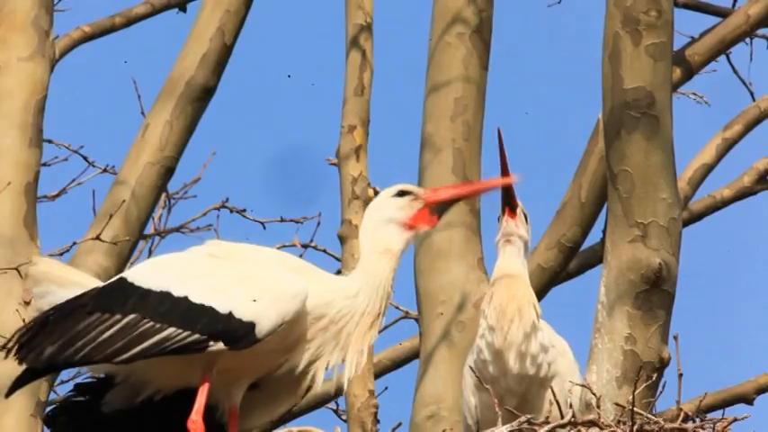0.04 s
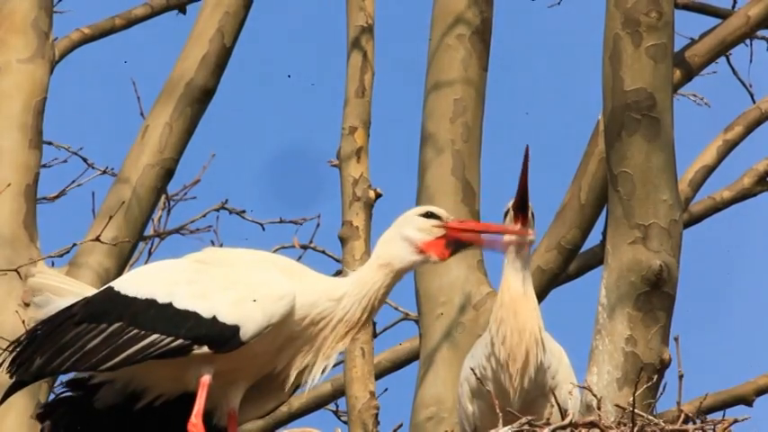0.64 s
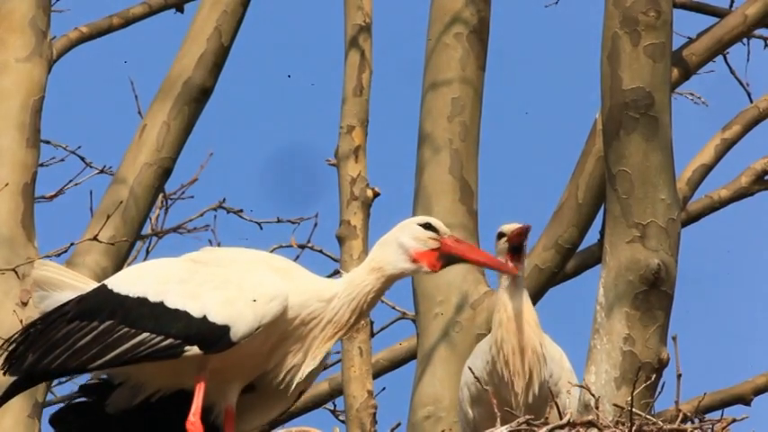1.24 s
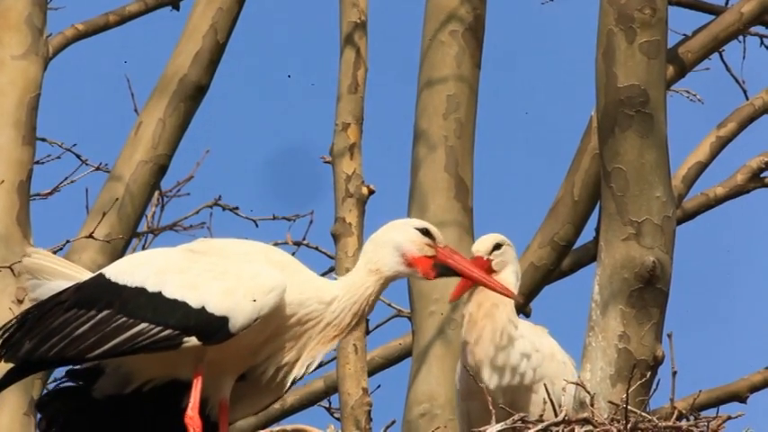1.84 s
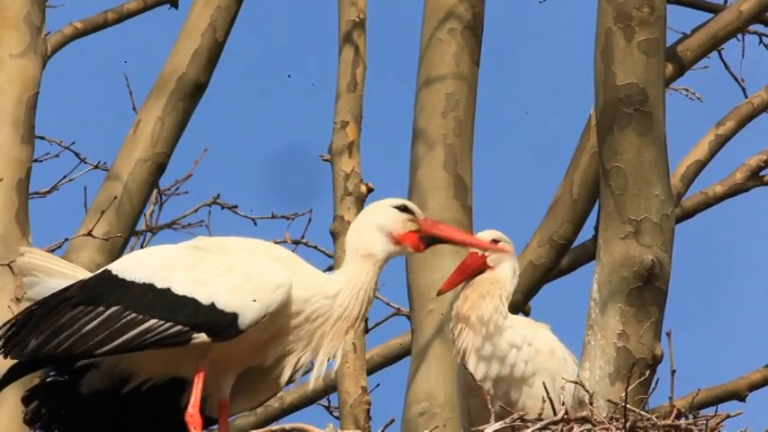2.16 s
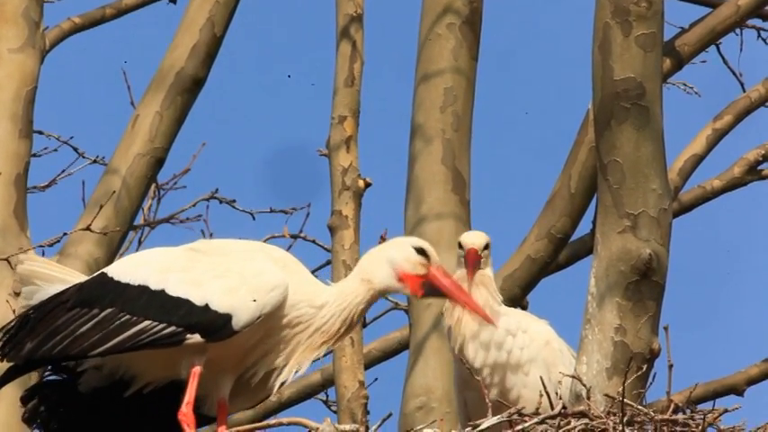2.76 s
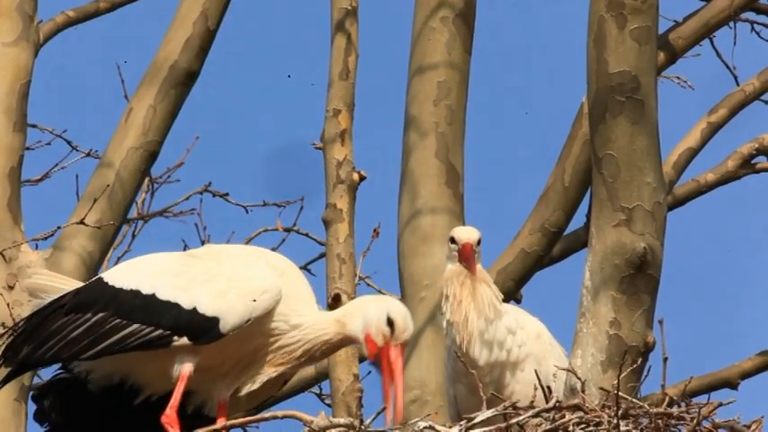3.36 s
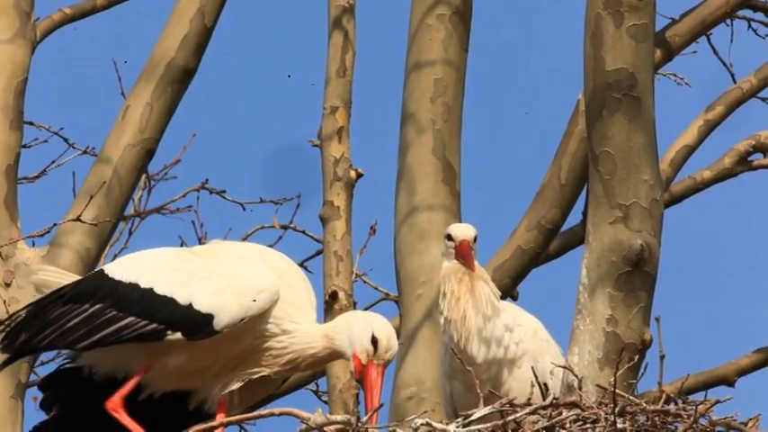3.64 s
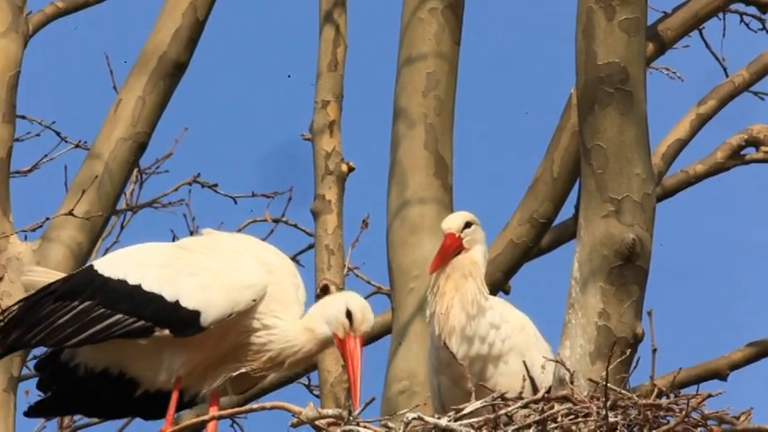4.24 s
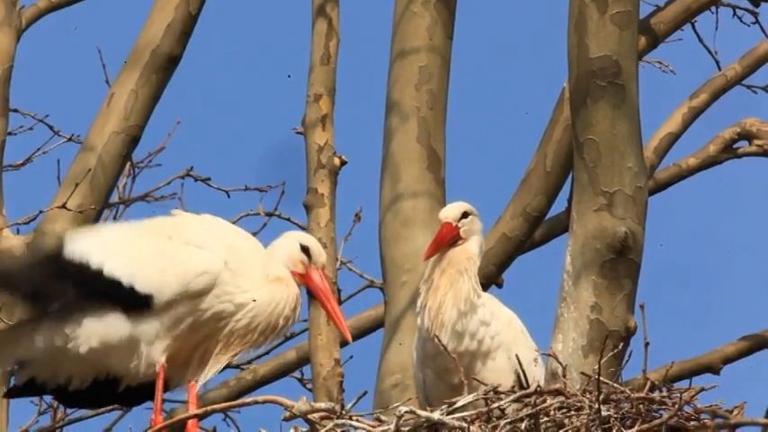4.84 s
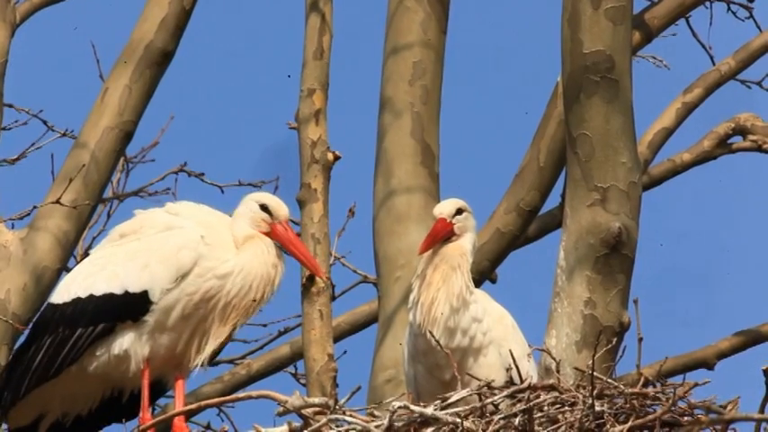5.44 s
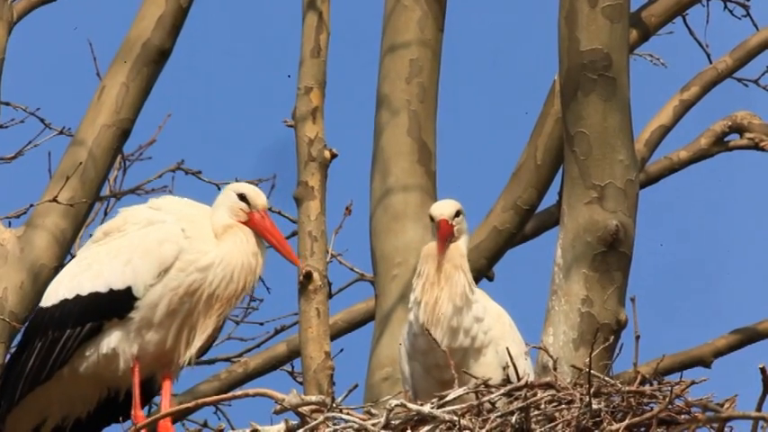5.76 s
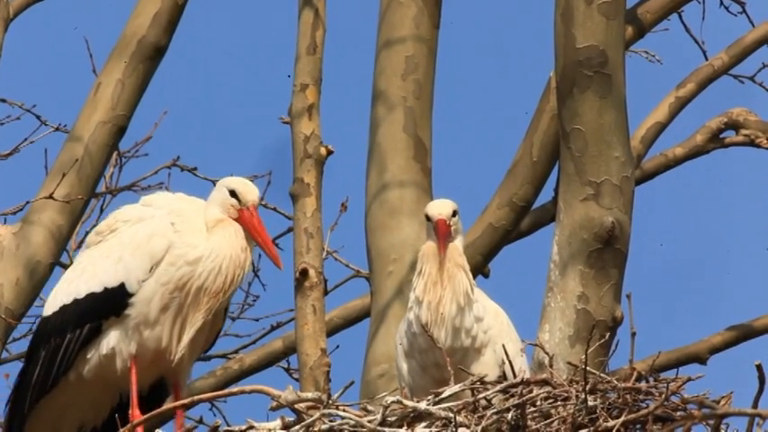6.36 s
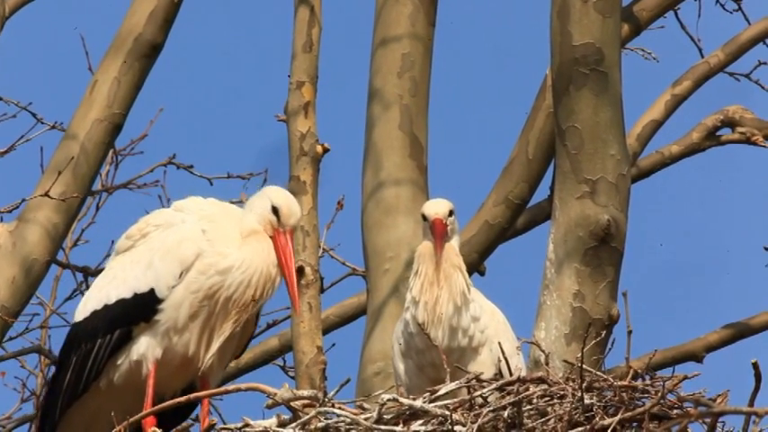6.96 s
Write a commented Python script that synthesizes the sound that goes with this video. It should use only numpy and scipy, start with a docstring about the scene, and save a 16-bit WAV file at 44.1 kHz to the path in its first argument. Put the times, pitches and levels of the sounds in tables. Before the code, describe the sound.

White storks clatter their bills in fast, hollow then dry clacking runs, over a steady outdoor rush and distant songbirds.

```python
"""A white stork colony, one microphone near the nests, in a steady rush of open air with songbirds further off.
A close stork clatters its bill in an even run of hollow clacks, neighbours joining in at first.
At about 3 s a second takes over with drier snaps, speeds up and turns away for a while; from 5 s the
neighbours are back. Each clack is the bill snapping shut and ringing with the throat pouch, and nearby
surfaces throw it back."""
import sys
import numpy as np
from scipy import signal
from scipy.fft import rfft, irfft, next_fast_len
from scipy.io import wavfile
from scipy.ndimage import map_coordinates

SR = 44100
rng = np.random.default_rng(int(sys.argv[2]) if len(sys.argv) > 2 else 0)


def int16_out(signal):
    """Quantize to a 16-bit WAV file."""
    q = np.round(np.clip(np.atleast_2d(signal).T, -1, 1) * 32767)
    wavfile.write(sys.argv[1], SR, q.astype(np.int16))


N = 317520
CONTACT_S = .005  # the bill's main contact comes this far into a clack

# pouch and bill resonances of a dry snap: centre_hz, width_hz, gain_db
DRY_BILL_MODES = [(712, 87, 15.6), (1597, 41, 17), (1877, 108, 17.6), (2540, 2200, 7.7), (3600, 2000, 12.6),
                  (5200, 1800, 17)]


def amp(db):
    return 10 ** (np.asarray(db) / 20)


def unit(x):
    return x / np.sqrt(np.mean(x ** 2) + 1e-20)


def along(points, hz):
    """Interpolate (frequency_hz, value) points on a log axis."""
    point_hz, values = np.transpose(points)
    return np.interp(np.log(hz + 1), np.log(point_hz + 1), values)


def wobble(rate):
    """A smooth random curve, rate knots a second."""
    return map_coordinates(rng.standard_normal(int(N * rate / SR) + 4), [np.arange(N) * rate / SR])


def filtered(x, response):
    """Shape x by a response that is a function of frequency."""
    size = next_fast_len(N + SR // 2)
    return irfft(rfft(x, size) * response(np.fft.rfftfreq(size, 1 / SR)), size)[:N]


def add(track, start_s, sound):
    i = int(np.clip(round(start_s * SR), 0, N))
    track[i:i + len(sound)] += sound[:N - i]


def noise(spectrum):
    """Coloured noise of rms 1."""
    return unit(filtered(rng.standard_normal(N), lambda hz: amp(along(spectrum, hz))))


def air():
    """The bed of the place: distant rumble with a low drone in it, a broad rush, and hiss, all wavering."""
    # swell of the surroundings: time_s, rush_gain_db, hiss_gain_db
    swell = [(.3, -41, -28), (.8, -40, -28), (2.88, -40.5, -30), (4.03, -45, -36), (5.01, -39.5, -29),
             (5.64, -39.5, -30.5), (6.64, -47.2, -37.5), (7.2, -42.5, -29)]
    # spectra of the three layers: frequency_hz, gain_db
    rumble_spectrum = [(20, -22), (30, -17), (42, 5.5), (65, 2), (100, 3.5), (160, 3), (290, -1),
                       (400, -27), (660, -120)]
    rush_spectrum = [(180, -36), (300, -1.5), (404, 4), (586, 3.5), (676, 5), (847, 4), (1010, -4.5),
                     (1120, 1), (1400, -5.5), (1820, -3), (3080, -120)]
    hiss_spectrum = [(820, -14), (1400, -6), (1500, 4), (1730, -0.5), (1900, 6.5), (2060, -1.5), (2660, 2),
                     (3100, -3.5), (3400, -0.5), (3720, -1), (5770, -4), (7300, -10), (16000, -42)]
    times, *gains = np.transpose(swell)
    rush_db, hiss_db = (np.interp(np.arange(N) / SR, times, gain) for gain in gains)
    drone = amp(-6.5) * noise([(54, -54), (66, -3), (71, -5), (76, -2), (92, -55)])
    rumble = amp(rush_db - 7 + .66 * wobble(10)) * (noise(rumble_spectrum) + drone)
    rush = amp(rush_db + .94 + .61 * wobble(8.6)) * noise(rush_spectrum)
    hiss = amp(hiss_db - 7 + 1.52 * wobble(25)) * noise(hiss_spectrum)
    return rumble + rush + hiss


def echoes(x, paths):
    """Reflections (delay_s, gain_db) off rough surfaces, which return less treble."""
    def response(hz):
        returns = sum(amp(db) * np.exp(-2j * np.pi * hz * delay_s) for delay_s, db in paths)
        return returns / (1 + (hz / 13000) ** 2)
    return filtered(x, response)


def scatter(delay_s, twigs_db, twigs_decay_s, size=12288):
    """A fresh impulse response of the place: a clump of reflections off branches, then a thin tail."""
    # reverberation among the nests: frequency_hz, t60_s
    decay_times = [(300, 0.095), (2000, 0.066), (6000, 0.38), (12000, 0.09)]
    hz, t, spectra = signal.stft(rng.standard_normal(size), SR, nperseg=256)
    decay = amp(-60 * t / along(decay_times, hz)[:, None])
    tail = signal.istft(spectra * decay, SR, nperseg=256)[1]
    t = np.arange(len(tail)) / SR
    twigs = rng.standard_normal(len(t)) ** 3 * np.exp(-t / twigs_decay_s)
    answer = tail / np.linalg.norm(tail) + amp(twigs_db) * twigs / np.linalg.norm(twigs)
    return np.pad(answer / np.linalg.norm(answer), (int(delay_s * SR), 0))


def whistle(length_s, start_hz, end_hz, db):
    """One slurred note: pitch and loudness arch together, and the pitch quavers."""
    progress = np.linspace(0, 1, int(length_s * SR))
    arch = np.abs(np.sin(np.pi * progress))
    quaver = map_coordinates(rng.standard_normal(10), [9 * progress])
    hz = (start_hz + (end_hz - start_hz) * progress) * (1 + .07 * (arch - .6) + .015 * quaver)
    return amp(db) * arch * np.sin(2 * np.pi * np.cumsum(hz) / SR)


def songbirds(far_notes=130, note_s=.041, spacing_s=.089, sag=.93):
    """Clear phrases and pips, amid far twittering that reaches the microphone only by way of the trees."""
    # opening slur of each phrase: start_s, start_hz, end_hz, gain_db
    phrases = [(1.046, 6420, 5500, -38), (1.9, 6790, 5180, -32.5), (2.258, 6810, 5150, -32),
               (2.925, 5530, 4910, -37.5), (3.64, 5500, 5270, -39), (4.23, 6040, 5000, -41),
               (4.549, 6740, 5040, -35.5), (4.999, 6150, 5500, -36.5), (5.424, 5620, 6230, -36),
               (6.253, 6900, 5170, -39), (6.624, 6700, 5300, -48), (6.999, 5320, 5750, -38)]
    # low single pips of another small bird: start_s, gain_db
    pips = [(4.05, -38.5), (4.66, -37), (7.03, -35)]
    near, far = np.zeros((2, N))
    for start_s, start_hz, end_hz, db in phrases:
        add(near, start_s, whistle(note_s, start_hz, end_hz, db))
        for step in (1, 2):  # two more notes step down and fade
            hz = (start_hz + end_hz) / 2 * .83 ** step
            add(near, start_s + step * spacing_s, whistle(note_s, hz, hz * sag, db - 4.5 * step))
    for start_s, db in pips:
        add(near, start_s, whistle(.03, 3320, 3320 * sag, db))
    for when, pitch, slur in rng.random((far_notes, 3)):
        hz = 3400 + 2700 * pitch
        add(far, when * N / SR, whistle(.028, hz, hz * (.72 + .45 * slur), db=-38.5))
    trees = scatter(delay_s=.011, twigs_db=-15, twigs_decay_s=.016)
    return amp(6) * near + signal.fftconvolve(amp(-2.5) * near + far, trees)[:N]


def sticks():
    """Dry nest sticks shift under the birds: short clumps of grains in one band each."""
    # knocks, snaps and rustles: start_s, length_s, centre_hz, level_db
    shifts = [(0.274, 0.01, 1140, -32.5), (0.627, 0.006, 1280, -29), (2.722, 0.12, 6550, -42),
              (6.481, 0.0026, 5500, -35), (6.697, 0.0034, 7300, -39), (6.806, 0.0027, 7700, -40)]
    track = np.zeros(N)
    for start_s, length_s, centre_hz, db in shifts:
        arch = np.sin(np.linspace(0, np.pi, int(length_s * SR)))
        band = signal.butter(2, [centre_hz * .8, centre_hz * 1.25], "band", fs=SR)
        grains = signal.lfilter(*band, rng.standard_normal(len(arch)) ** 3)
        add(track, start_s, amp(db) * unit(grains * arch))
    return track


def clack(modes, ring_db, crack_db, bill_hz, rattle, spread_s, top_hz, size=2048):
    """One closing of the bill: a main contact, the long edges also touching just before and after."""
    t = np.arange(size) / SR - CONTACT_S
    hz = np.fft.rfftfreq(size, 1 / SR)
    touches = rng.standard_normal(size) ** 3 * np.exp(-np.abs(t) / spread_s) * (t > -.0014)
    # the light touches make up the crack; the main contact does more of the ringing
    touch_share = np.clip(rattle, .28, 1) * np.interp(hz, [2800, 4200], [.3, .9])
    # bending waves run along the bill, the treble fastest
    bending = np.clip(rattle, 0, 1) * (.17 * np.sqrt(hz) - .0017 * hz)
    contact = np.exp(-2j * np.pi * (hz * CONTACT_S + bending))
    force = np.sqrt(touch_share) * rfft(touches) / np.linalg.norm(touches)
    force += np.sqrt(1 - touch_share) * contact
    body = 0
    for centre, width, db in modes:
        if 1000 < centre < 4000:  # the bill's resonances shift with posture; the pouch keeps its note
            centre = centre * bill_hz / 1820
        resonance = 1j * hz * width / (centre ** 2 - hz ** 2 + 1j * hz * width)
        body = body + amp(db + rng.normal(0, 1)) * resonance
    # a slender bill radiates little bass; distance takes off the top
    spectrum = force * body * hz ** 2 / (hz ** 2 + 330 ** 2) / np.sqrt(1 + (hz / top_hz) ** 10.3)
    lowpass = 1 / (1 + (hz / 3400) ** 12)
    ring, crack = irfft(spectrum * lowpass), irfft(spectrum * (1 - lowpass))
    # levels are rms over 5 ms
    return (amp(ring_db) * unit(ring) + amp(crack_db) * unit(crack)) * np.sqrt(.005 * SR / size)


def far_nests(count=120):
    """Faint, scattered clacks from across the colony."""
    track = np.zeros(N)
    for when, strength, pitch in rng.random((count, 3)):
        db = -41.5 + 4.8 * strength
        bill_hz = 1650 + 350 * pitch
        snap = clack(DRY_BILL_MODES, db, db + 2.5, bill_hz, rattle=.98, spread_s=.0096, top_hz=7200)
        add(track, when * N / SR, snap)
    return track


def tilted(modes, overtones_db):
    """The same resonances with the overtones raised or lowered."""
    return [(hz, width, db + overtones_db * (hz > 2200)) for hz, width, db in modes]


def run_of_clacks(tempo, closing):
    """The bill beats on at its tempo, no two strokes alike. Rows: time_s, ring_db, crack_db, rattle."""
    times = [tempo[0][0]]
    while times[-1] <= tempo[-1][0]:
        times.append(times[-1] + 1 / np.interp(times[-1], *np.transpose(tempo)))
    times = np.array(times[:-1])
    closing_s, *controls = np.transpose(closing)
    ring_db, crack_db, rattle = (np.interp(times, closing_s, control) for control in controls)
    softness, looseness = rng.standard_normal((2, len(times)))
    uneven_db = -.34 * softness
    return np.column_stack([times, ring_db + uneven_db, crack_db + uneven_db, rattle * (1 + .049 * looseness)])


def clatter(strokes, posture, modes, side_modes, near_paths, far_paths, spread_s, top_hz,
            ring_gain_db, crack_gain_db, side_fill, scatter_db, scatter_delay_s, twigs_db):
    """Clacks and their echoes. A bird that turns away loses more direct sound than reflected sound."""
    direct, sideways, scattered = np.zeros((3, N))
    posture_s, *colour = np.transpose(posture)
    full_ring_db, full_crack_db = np.max(strokes, axis=0)[1:3]
    for time_s, ring_db, crack_db, rattle in strokes:
        bill_hz, overtones_db = (np.interp(time_s, posture_s, column) for column in colour)
        timbre = bill_hz, rattle, spread_s, top_hz
        start_s = time_s - CONTACT_S
        front = clack(tilted(modes, overtones_db), ring_db + ring_gain_db, crack_db + crack_gain_db, *timbre)
        add(direct, start_s, front)
        # as the bird turns away, more ring than crack goes out to the side
        side_ring_db = ring_db + side_fill * (full_ring_db - ring_db)
        side_crack_db = crack_db + side_fill * (full_crack_db - crack_db) / 2 + .5
        side = clack(tilted(side_modes, overtones_db), side_ring_db, side_crack_db, *timbre)
        add(sideways, start_s, side)
        branches = scatter(scatter_delay_s, twigs_db, twigs_decay_s=.0064)
        add(scattered, start_s, signal.fftconvolve(side, branches))
    return direct + echoes(direct, near_paths) + echoes(sideways, far_paths) + amp(scatter_db) * scattered


def neighbours():
    """Storks on nearby nests: each run keeps its beat while it fades or swells."""
    # even runs: first_s, last_s, clack_count, first_ring_db, last_ring_db, crack_over_ring_db
    runs = [(0.108, 1.235, 9, -19, -26, -8.5), (0.1798, 0.5523, 4, -22, -25, -14),
            (0.2225, 0.8977, 7, -20, -27, -12.5), (5.168, 6.3642, 10, -28.5, -26, -10.5),
            (6.494, 6.8747, 4, -26.5, -26.5, -6), (7.017, 7.163, 2, -26.5, -27.5, -9)]
    # bill colour as the heads move: time_s, bill_hz, overtones_db
    posture = [(.1, 1940, 2.7), (1.2, 1800, 0), (5.2, 1780, -3.1), (7.2, 1800, 1)]
    # pouch and bill resonances: centre_hz, width_hz, gain_db
    modes = [(707, 127, 8.5), (1510, 47, -9), (1727, 170, 12.5), (2350, 85, 9.5), (4020, 330, -16),
             (6560, 580, -35)]
    rattle = .741
    strokes = []
    for first_s, last_s, count, first_db, last_db, crack_over_ring_db in runs:
        for time_s, db in np.linspace((first_s, first_db), (last_s, last_db), count):
            strokes.append((time_s, db, db + crack_over_ring_db, rattle))
    return clatter(strokes, posture, modes, side_modes=modes,
                   near_paths=[(.0058, -7.5)], far_paths=[(.021, -54)], spread_s=.0067, top_hz=7200,
                   ring_gain_db=1, crack_gain_db=6.4, side_fill=.062,
                   scatter_db=-7, scatter_delay_s=.008, twigs_db=-5)


def hollow_stork():
    """The first close bird: even, hollow clacks, each doubled by the shortest echo."""
    # beat of the bill: time_s, clacks_per_s
    tempo = [(.1265, 8.743), (1.22, 9.082), (1.43, 8.807), (2.38, 8.754), (3.19, 8.806)]
    # how the bill closes: time_s, ring_db, crack_db, rattle (0-1)
    closing = [(.13, -19.5, -27.5, 0.88), (1.68, -19, -25, 0.91), (1.85, -19, -28.5, 0.67),
               (2.14, -18.5, -29, 0.65), (2.28, -19, -24.5, 0.61), (2.65, -18.5, -28.5, 0.52),
               (2.95, -20.5, -32.5, 0.84), (3.18, -27.5, -43, 0.99)]
    # bill colour as the head moves: time_s, bill_hz, overtones_db
    posture = [(.1, 1816, 3), (1, 1777, 3.5), (1.7, 1830, 2), (2.1, 1910, -3), (2.5, 1890, -2.5),
               (3.1, 1814, -3.5)]
    # pouch and bill resonances: centre_hz, width_hz, gain_db
    modes = [(717, 270, -4), (1660, 52, -27), (1814, 167, 8.5), (2587, 300, 3), (3190, 57, -3),
             (4280, 790, -13), (6370, 1500, -11.5)]
    return clatter(run_of_clacks(tempo, closing), posture, modes, side_modes=modes,
                   near_paths=[(.00462, -2.1)], far_paths=[(.0124, -16), (.0381, -11)],
                   spread_s=.0034, top_hz=6450, ring_gain_db=.1, crack_gain_db=1.8, side_fill=.37,
                   scatter_db=-8.5, scatter_delay_s=.007, twigs_db=.5)


def dry_stork():
    """The second close bird: drier snaps, heard more by their echoes while it faces off the microphone."""
    # beat of the bill: time_s, clacks_per_s
    tempo = [(3.1263, 8.107), (3.24, 8.747), (3.69, 8.947), (3.91, 12.055), (4.11, 11.418), (4.98, 11.321),
             (6.07, 9.809), (6.37, 9.086), (7.19, 8.86)]
    # how the bill closes: time_s, ring_db, crack_db, rattle (0-1)
    closing = [(3.13, -23.5, -27, 0.14), (3.25, -21, -19.5, 0.038), (3.4, -19.5, -26.5, 0.34),
               (3.901, -22, -22.5, 0.82), (4.07, -25.5, -26.5, 0.35), (4.17, -46, -31.5, 0.28),
               (4.51, -38.5, -36, 0.28), (4.8, -28.5, -30.5, 0.52), (5.52, -32, -25, 0.33),
               (5.78, -25.5, -19.5, .03), (6.08, -25, -22, 0.17), (6.28, -23.5, -23.5, 0.62),
               (7.17, -21.5, -22, 0.85)]
    # bill colour as the head moves: time_s, bill_hz, overtones_db
    posture = [(3.1, 1870, 0.48), (3.7, 1783, -0.3), (6.2, 1724, -2.1), (6.4, 2130, 2.3), (7.2, 1840, 0)]
    # resonances as they sound to the side: centre_hz, width_hz, gain_db
    side_modes = [(700, 160, 15.5), (1545, 110, 19), (2656, 500, 17.5), (5900, 4800, 14.5)]
    return clatter(run_of_clacks(tempo, closing), posture, DRY_BILL_MODES, side_modes,
                   near_paths=[(.00462, -6)], far_paths=[(.0192, -15), (.044, -19.5)],
                   spread_s=.0035, top_hz=7650, ring_gain_db=-.64, crack_gain_db=-1.5, side_fill=1.21,
                   scatter_db=-15.5, scatter_delay_s=.008, twigs_db=8)


def scene():
    """The colony as it arrives at the microphone, in mono."""
    storks = hollow_stork() + dry_stork() + neighbours() + far_nests()
    return (storks + sticks() + songbirds() + air())[None]


def record(dry, silence_s=.085, fade_s=.0056, ceiling=.9, top_hz=15900):
    """The sound opens after a moment of silence; sharp peaks are rounded off and the top treble is cut."""
    opening = np.clip((np.arange(N) / SR - silence_s) / fade_s, 0, 1)
    rounded = dry[0] / (1 + np.abs(dry[0] / ceiling) ** 6) ** (1 / 6)
    return filtered(rounded * opening, lambda hz: hz < top_hz)[None]


dry = scene()
out = record(dry)
int16_out(out)
```